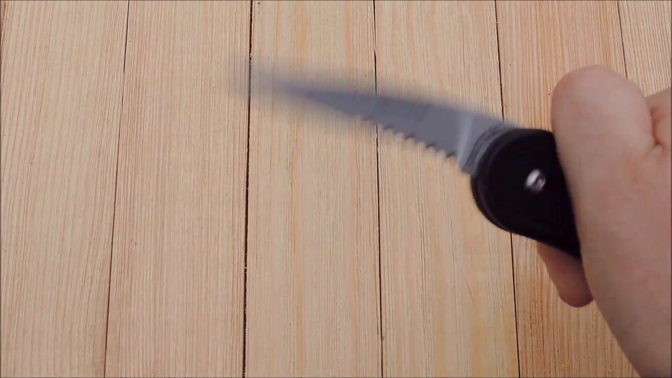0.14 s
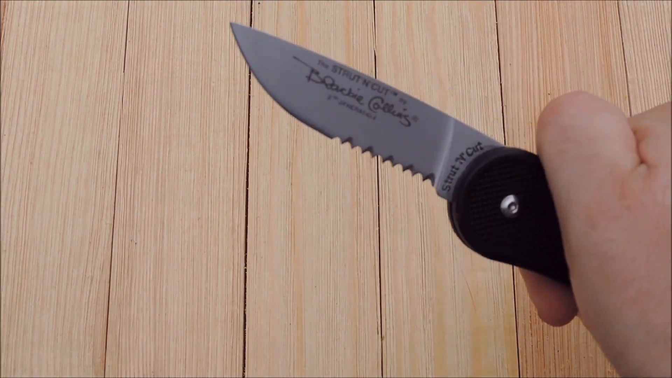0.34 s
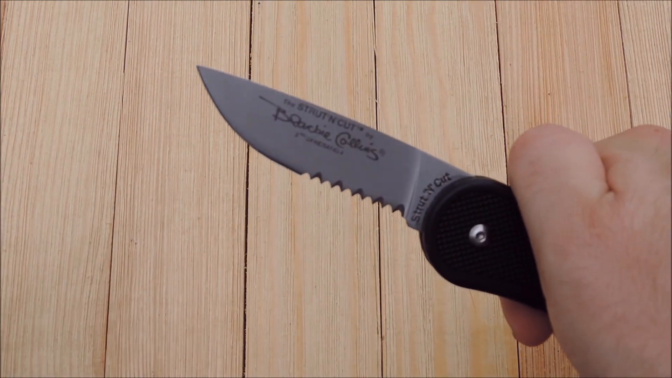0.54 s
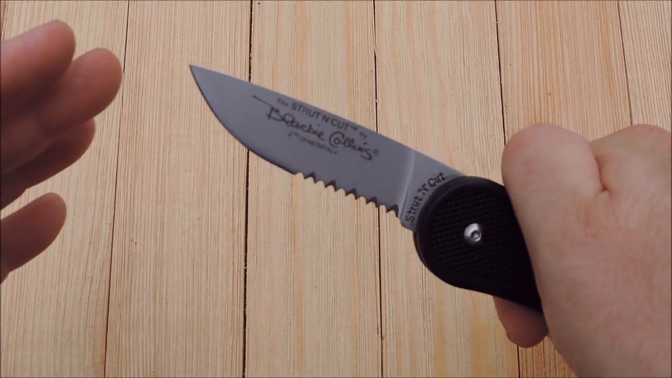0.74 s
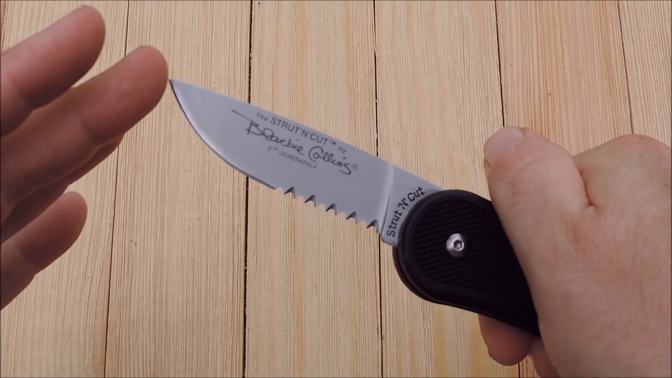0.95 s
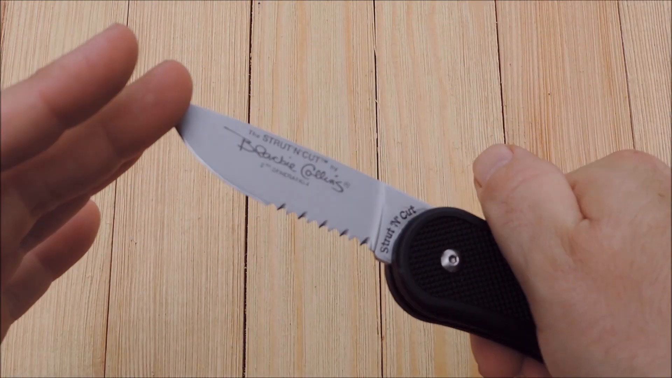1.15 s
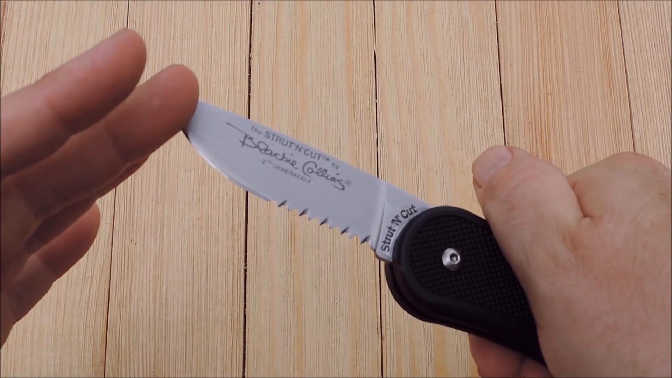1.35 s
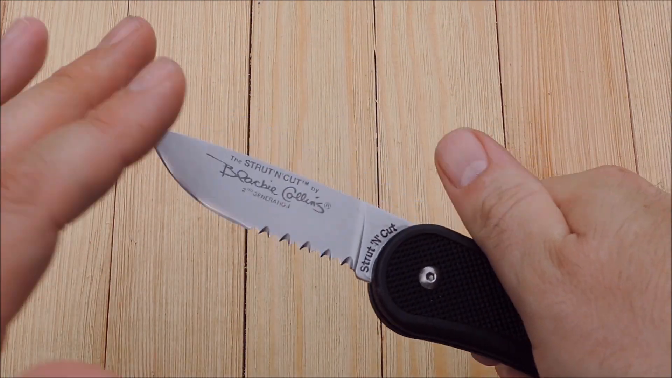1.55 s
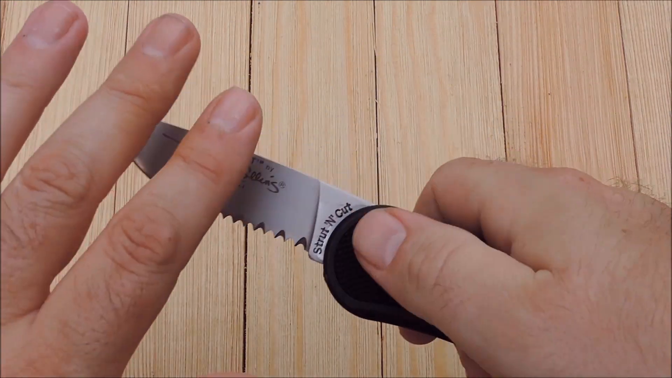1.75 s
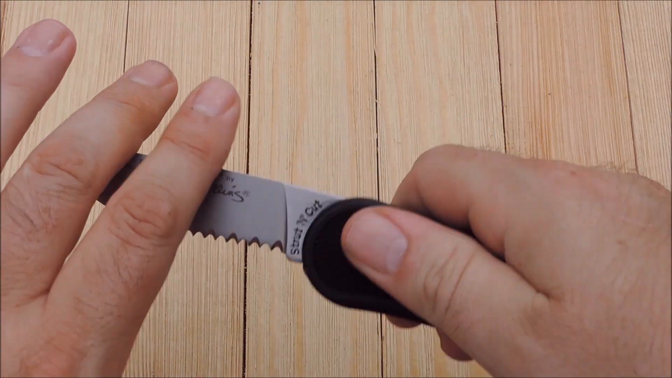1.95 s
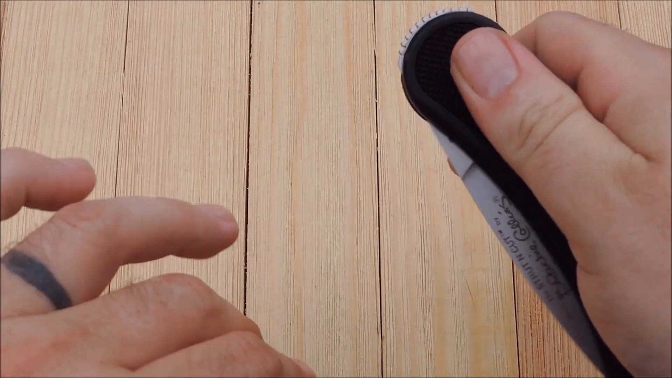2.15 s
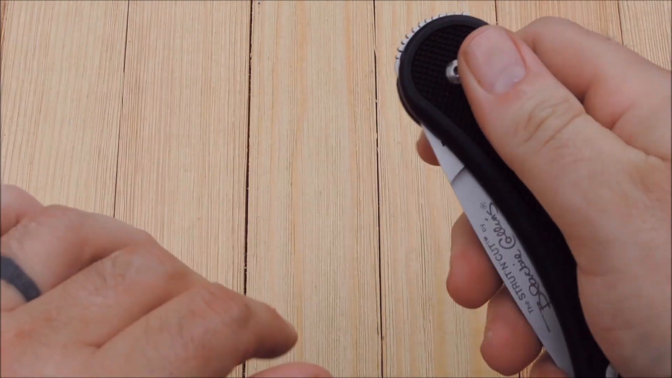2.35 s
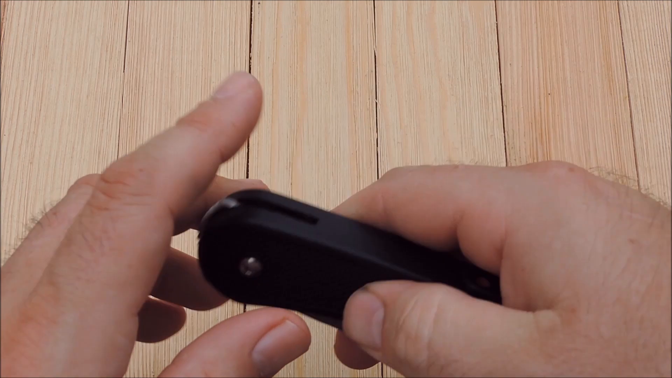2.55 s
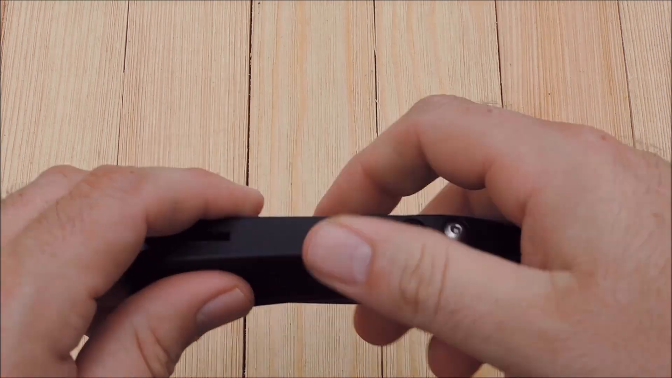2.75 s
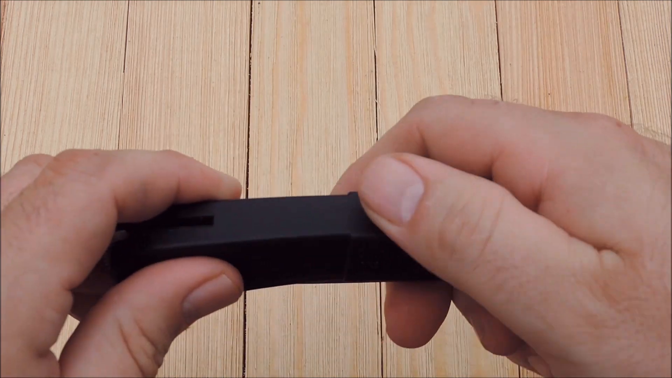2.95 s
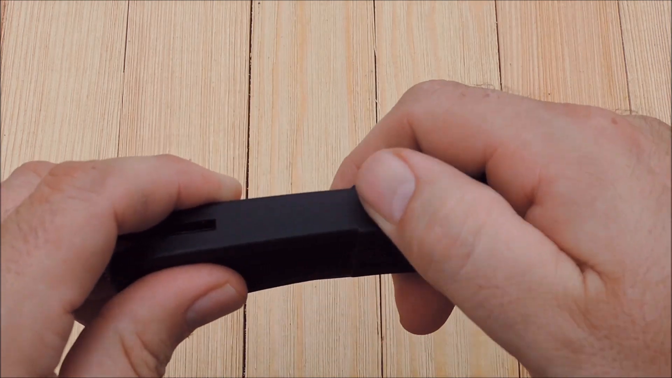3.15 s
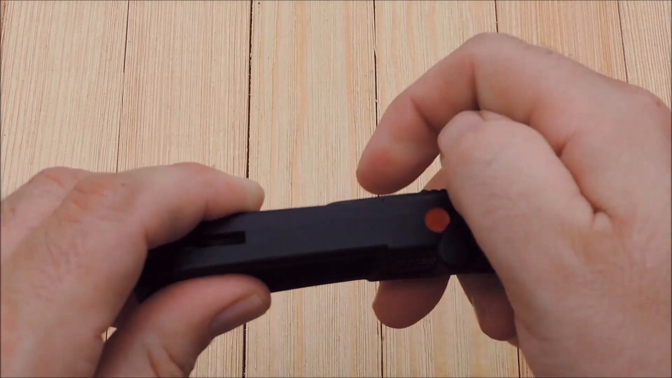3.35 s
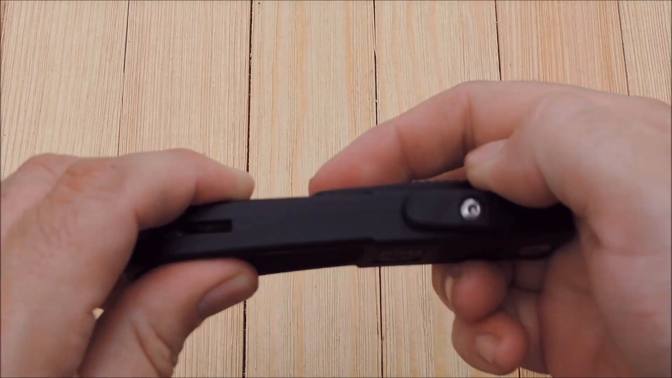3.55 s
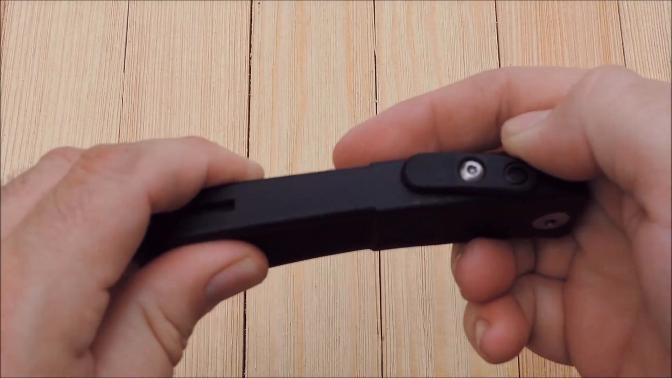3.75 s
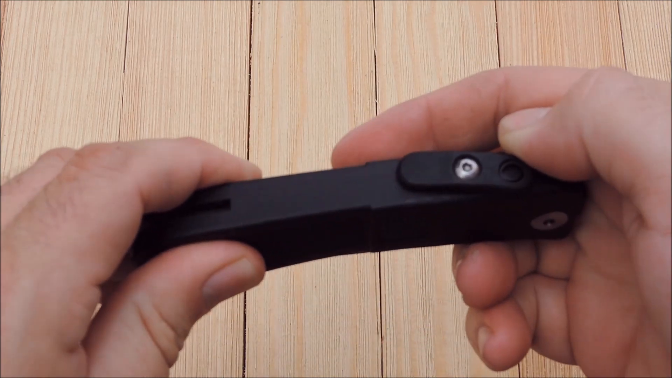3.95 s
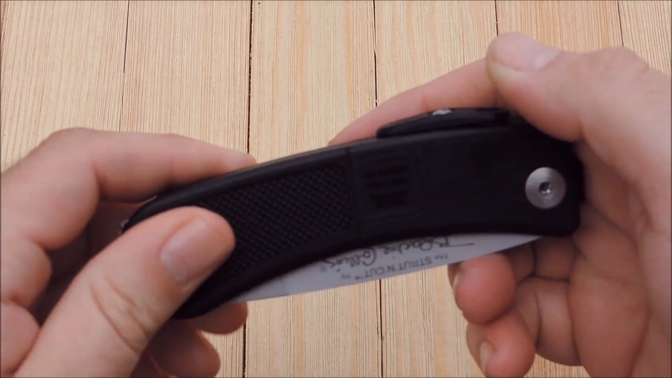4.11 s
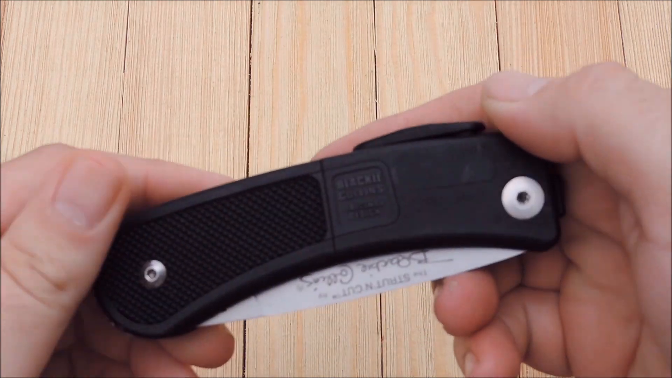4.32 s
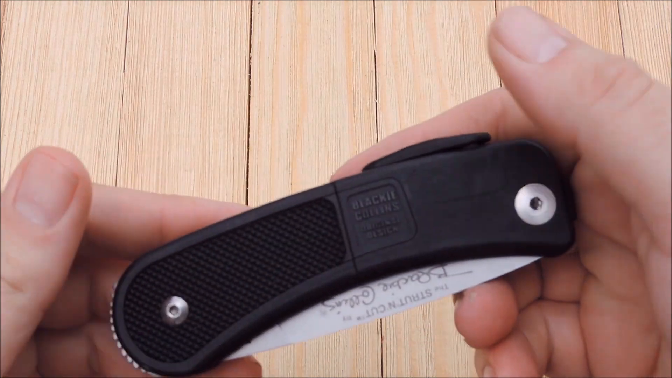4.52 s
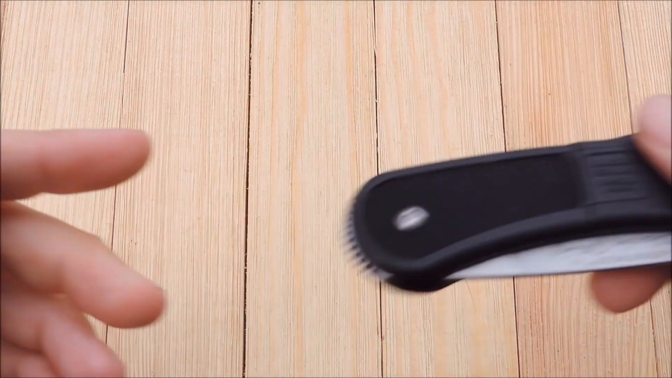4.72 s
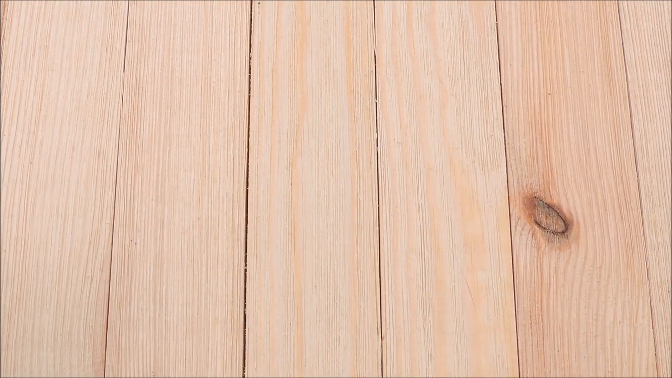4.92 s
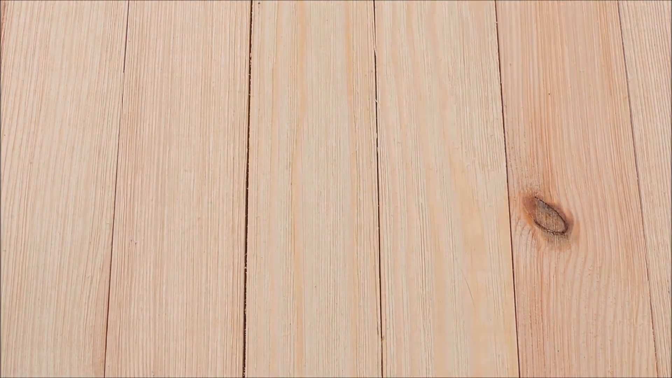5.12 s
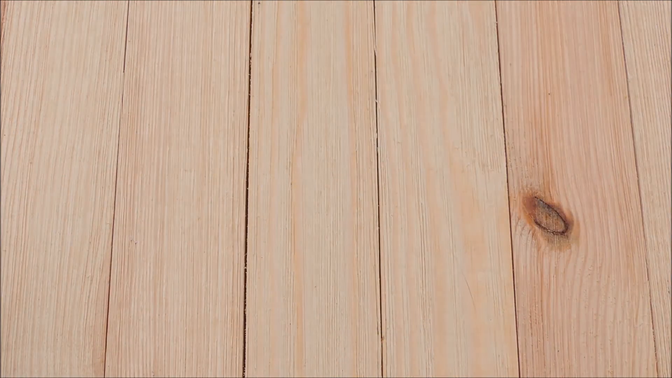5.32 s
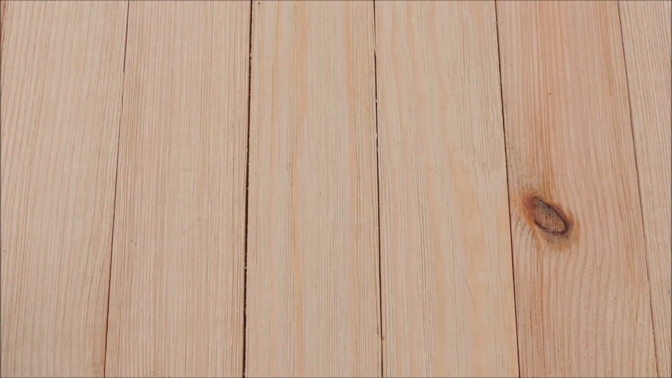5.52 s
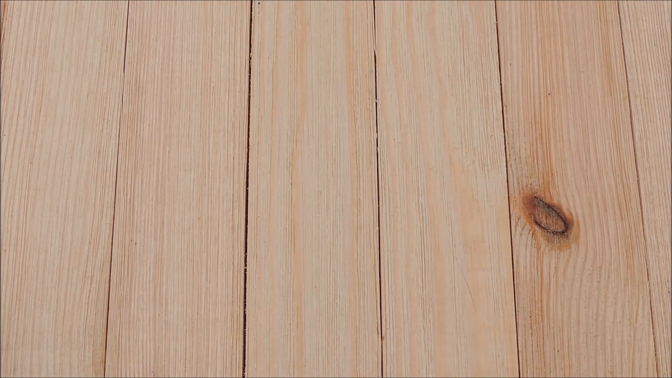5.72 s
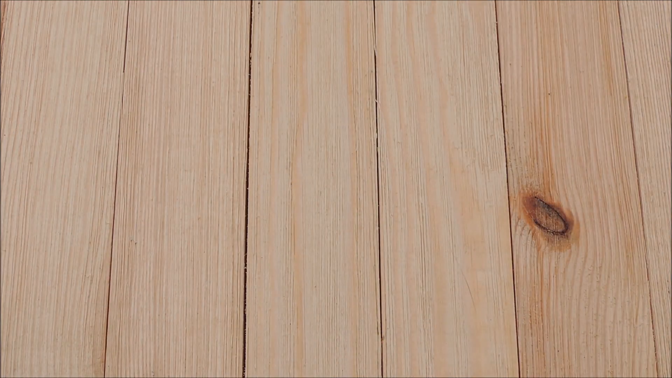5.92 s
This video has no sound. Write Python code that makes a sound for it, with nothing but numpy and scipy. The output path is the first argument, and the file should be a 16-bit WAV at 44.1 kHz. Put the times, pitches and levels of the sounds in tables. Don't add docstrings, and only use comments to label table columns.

```python
import sys
import numpy as np
from scipy import signal
from scipy.fft import rfft, irfft, next_fast_len
from scipy.io import wavfile
from scipy.ndimage import uniform_filter1d

SR = 44100
rng = np.random.default_rng(int(sys.argv[2]) if len(sys.argv) > 2 else 0)


def volts_from_decibels(level):
    exponent = np.asarray(level, float) / 20
    return 10 ** exponent


def log_audio(samples):
    frames = np.atleast_2d(samples).T
    limited = np.clip(frames, -1, 1)
    pcm = np.round(limited * 32767).astype(np.int16)
    wavfile.write(sys.argv[1], SR, pcm)


N = 267775
MS = 1000
HISS_TOP_HZ = 13520
OPEN_S, SHUT_S, CATCH_S = 0.3443, 2.2979, 3.7505

# (frequency [Hz], width [Hz], level [dB])
OPEN_STEEL = [(620, 580, -8.5), (1200, 480, -5), (3170, 740, 2.5), (3970, 730, 2.5), (4820, 590, -0.5),
              (6330, 590, -2.5), (8950, 580, -7), (11470, 520, -5), (13950, 1400, -9), (15400, 1070, -13)]
# (frequency [Hz], width [Hz], level [dB])
SHUT_STEEL = [(483, 160, -24), (1390, 1460, -3), (3280, 890, -4.5), (4200, 360, 5), (5700, 300, 0.5),
              (6810, 370, 0), (7900, 1000, -5.5), (9500, 480, -3), (11020, 370, -10), (12500, 670, -6.5),
              (15000, 1470, -16)]
# (frequency [Hz], width [Hz], level [dB])
CATCH_STEEL = [(500, 620, -25), (1500, 1300, -6), (2600, 1800, -6), (4430, 430, -6.5), (5850, 270, -1.5),
               (6970, 460, -2), (7900, 580, 3.5), (9300, 1450, -8.5), (12150, 550, -6), (14100, 580, -2),
               (15180, 800, -4)]
# (frequency [Hz], width [Hz], level [dB])
TABLE_MODES = [(600, 630, 1.5), (1310, 540, 6.5), (2400, 730, 6), (3180, 1450, 1.5), (5430, 690, -1.5),
               (7540, 930, -6), (9500, 700, -3), (12100, 1500, -16), (14000, 1200, -15), (15500, 800, -14)]
# (frequency [Hz], width [Hz], level [dB])
SLIDE_MODES = [(1900, 480, 0.5), (2700, 850, 2), (3580, 900, 1), (5440, 1200, -2), (7500, 1500, -11),
               (10000, 2000, -15), (13500, 1500, -12)]

# (frequency [Hz], density [dB per Hz])
HUM_SPECTRUM = [(12, -37), (20, -4), (122, -7), (182, -7), (220, -1.5), (261, -8), (454, -10.5), (561, -15),
                (1020, -15), (3200, -27.5), (4160, -59), (7040, -120)]
# (frequency [Hz], width [Hz], lift [dB])
STANDING_WAVES = [(55.7, 11.5, 4.5), (120.7, 10, 11.5), (158, 7.4, 4.5), (217.5, 4.2, 6.5), (235, 8.6, 4.5),
                  (292, 8.2, 5.5), (357.3, 8, 5), (374.5, 5.7, 4.5), (447.7, 10, 7.5), (668, 5.7, 6.5)]
# (frequency [Hz], density [dB per Hz])
HISS_SPECTRUM = [(2200, -39), (3000, -12), (3700, -4), (4600, -0.5), (5900, -3), (6500, -6.5),
                 (7600, -11.5), (8500, -17.5), (9500, -8.5), (10200, -13), (10600, -20), (13400, -22.5)]
# (frequency [Hz], width [Hz], lift [dB])
HISS_PEAKS = [(3580, 60, 5.5), (4490, 130, 5), (4830, 90, 3), (5530, 100, 0.5), (6000, 130, 1),
              (9860, 81, 3)]
# (frequency [Hz], correlation [-1 to 1])
LIKENESS = [(60, 0.9), (110, 0.96), (200, 0.95), (380, 0.88), (700, 0.73), (1290, 0.28), (2380, 0.14),
            (4400, -0.33), (8120, 0.17), (15000, 0.16)]
# (frequency [Hz], t60 [s])
REVERBERATION = [(300, 0.12), (2000, 0.26), (6000, 0.44), (14000, 0.15)]
# (frequency [Hz], level [dB])
ANSWER_LEVEL = [(500, 0), (2000, -4.5), (3200, -4.5), (6000, 3.5), (14000, -4.5)]

# (step down [s], release starts [s])
GAIN_STEPS = [
    (.002, 0.28),
    (0.348, 0.69),
    (2.301, 2.61),
    (3.756, 4.065),
]
# (time after first touch [ms], ring level [dB], ring frequency [Hz], ring swell [ms], crack level [dB])
OPEN_STAGES = [
    (0, -11.5, 2990, 0.33, -14),
    (.35, -6.5, 1965, .95, -25),
    (1.5, -23.5, 990, 0.6, -22),
]
SHUT_STAGES = [
    (0, -23, 1090, .17, -14),
    (.6, -5.5, 2580, .38, -30),
    (2.4, -14, 1900, 0.7, -12),
    (3.2, -7.5, 2330, .48, -29),
]
CATCH_STAGES = [
    (0, -30, 1120, 0.4, -32),
    (1.2, -28.5, 3220, 0.53, -20),
    (1.9, -29, 1840, .6, -23.5),
    (2.6, -33, 600, 0.34, -33),
]
# (time [s], ring level [dB], ring frequency [Hz], crack over ring [dB])
OPEN_TICKS = [
    (.0085, -42, 1900, -7),
    (.2535, -45.5, 1920, -17),
    (.3025, -40, 2100, -10),
    (.3115, -31.5, 1900, -24),
    (.337, -43.5, 1950, -6),
    (.372, -42, 1950, -14),
    (.402, -46, 1900, -4),
]
SHUT_TICKS = [
    (2.2565, -43.5, 2240, -7),
    (2.3125, -44, 2220, -3),
    (2.3465, -27, 2680, -5.5),
    (2.347, -31, 2080, -27),
    (2.4395, -40, 2730, -13),
]
SLIDE_TICKS = [
    (3.395, -39.5, 1950, 5),
    (3.3975, -36.5, 3420, -7),
    (3.402, -42, 2600, -10),
    (3.512, -32.5, 2920, -14),
    (3.595, -40, 2000, -14),
    (3.668, -63.5, 3000, 9),
]
# (time [s], thump level [dB], thump frequency [Hz], thump swell [ms], rattle level [dB])
TABLE_CONTACTS = [
    (5.9041, -34, 790, 0.48, -29.5),
    (5.9275, -23.5, 1200, 0.18, -30),
]
# (time [s], level [dB])
SWISH_TIMES = [
    (1.33, -59.5),
    (2.72, -64),
    (4.03, -64),
    (4.5, -63),
    (5.36, -59),
]


def unit(x):
    return x / np.sqrt(np.mean(x ** 2) + 1e-20)


def along(points, hz):
    f, v = np.transpose(points)
    return np.interp(np.log(hz + 1), np.log(f + 1), v)


def filtered(x, response):
    n = x.shape[-1]
    m = next_fast_len(n + 8192)
    return irfft(rfft(x, m) * response(np.fft.rfftfreq(m, 1 / SR)), m)[..., :n]


def resonances(modes):
    def response(f):
        total = 0
        for k, (centre, width, db) in enumerate(modes):
            damping = 1j * f * width
            total = total + (-1) ** k * volts_from_decibels(db) * damping / (centre * centre - f * f + damping)
        return total
    return response


def rush(response, patchy_db):
    z = signal.stft(rng.standard_normal((2, N)), nperseg=512)[2]
    field = uniform_filter1d(rng.standard_normal(z.shape[1:]), 8, axis=0)
    field = uniform_filter1d(field, 16, axis=1)
    pair = signal.istft(z * volts_from_decibels(patchy_db * unit(field)), nperseg=512)[1][:, :N]

    def mid_side(hz):
        turn = np.arccos(np.clip(along(LIKENESS, hz), -1, 1)) / 2
        return response(hz) * np.array([np.cos(turn), np.sin(turn)])

    mid, side = filtered(pair, mid_side)
    return unit(np.array([mid + side, mid - side]))


def lift(hz, bands):
    return 1 + sum((volts_from_decibels(db) - 1) / (1 + (2 * (hz - c) / w) ** 2) for c, w, db in bands)


def air():
    hum = rush(lambda hz: volts_from_decibels(along(HUM_SPECTRUM, hz)) * lift(hz, STANDING_WAVES), patchy_db=0.8)
    hiss = rush(lambda hz: volts_from_decibels(along(HISS_SPECTRUM, hz)) * lift(hz, HISS_PEAKS) * (hz < HISS_TOP_HZ),
                patchy_db=0.9)
    hum_balance_db, hiss_balance_db = [[0.45], [-0.45]], [[-0.2], [0.2]]
    return volts_from_decibels(-48.5) * hum * volts_from_decibels(hum_balance_db) + volts_from_decibels(-55.5) * hiss * volts_from_decibels(hiss_balance_db)


def room(x):
    hz, t, z = signal.stft(rng.standard_normal((2, SR // 3)), SR, nperseg=128)
    walls = volts_from_decibels(-60 * t / along(REVERBERATION, hz)[:, None])
    near_scatter = volts_from_decibels(14.5 - 60 * t / 0.029)
    brightness = volts_from_decibels(along(ANSWER_LEVEL, hz))[:, None]
    tail = signal.istft(z * (walls + near_scatter) * brightness, SR, nperseg=128)[1]
    late = np.pad(x.mean(axis=0), (130, 0))[None]
    return signal.fftconvolve(late, tail / np.linalg.norm(tail[0]), axes=1)[:, :N]


def swishing():
    t = np.arange(N) / SR
    grain = rush(np.ones_like, patchy_db=2.2)
    swish_s, glide_s = 0.11, 0.032

    def swell(late_s):
        return sum(volts_from_decibels(db) * np.exp(-((t - s - late_s) / swish_s) ** 2) for s, db in SWISH_TIMES)

    def band(hz, width):
        resonator = resonances([(hz, width, 0)])
        return unit(filtered(grain, lambda f: resonator(f) ** 2 * (f < HISS_TOP_HZ)))

    lower = swell(-glide_s) * band(hz=3660, width=760)
    upper = volts_from_decibels(1.0) * swell(glide_s) * band(hz=4300, width=1200)
    return lower + upper


def pivot():
    t = np.arange(N) / SR
    rise = np.clip((t - 0.27) / 0.03, 0, 1) ** 2
    rush_db = 15.5 * np.clip(1 + (t - OPEN_S) / 0.0128, 0, 1)
    stop = np.exp(-np.clip(t - OPEN_S, 0, None) / 0.0062)
    modes = [(1950, 380, 4.0), (4750, 900, -3), (9900, 4000, -13.5), (15000, 2020, -17)]
    return volts_from_decibels(-54.5 + rush_db) * rise * stop * rush(resonances(modes), patchy_db=2.0)


def ticks(rows, swell_ms):
    return [(s, db, hz, swell_ms, db + crack_db) for s, db, hz, crack_db in rows]


def snap(s, stages):
    return [(s + ms / MS, *rest) for ms, *rest in stages]


def rebounds(s, first_ms, gap_ms, ring_db, ring_hz, loss_db, swell_ms, crack_db, count):
    rows = []
    for k in range(count):
        time = s + (first_ms + k * gap_ms) / MS
        hz = ring_hz + 70 * rng.standard_normal()
        crack = ring_db + crack_db - k * (loss_db + 2.5)
        rows.append((time, ring_db - k * loss_db, hz, swell_ms, crack))
    return rows


def laying():
    rows = []
    for s, db, hz, swell_ms, rattle_db in TABLE_CONTACTS:
        rows.append((s, db, hz, swell_ms, db - 17))
        rows += rebounds(s, first_ms=1.7, gap_ms=4.2, ring_db=rattle_db, ring_hz=2000, loss_db=3,
                         swell_ms=0.76, crack_db=-11, count=4)
    return rows


def opening():
    chatter = rebounds(OPEN_S, first_ms=9, gap_ms=3.7, ring_db=-27.5, ring_hz=1950, loss_db=3.5,
                       swell_ms=0.5, crack_db=-4, count=3)
    return snap(OPEN_S, OPEN_STAGES) + chatter + ticks(OPEN_TICKS, swell_ms=0.71)


def closing():
    chatter = rebounds(SHUT_S, first_ms=6, gap_ms=2, ring_db=-25, ring_hz=2300, loss_db=9,
                       swell_ms=0.5, crack_db=-4, count=2)
    return snap(SHUT_S, SHUT_STAGES) + chatter + ticks(SHUT_TICKS, swell_ms=0.57)


def knife(contacts, steel, crack_ms, apart, pan_db, lag_ms, shell):
    choke = 1.27
    rings, cracks = np.zeros((2, 2, N + SR // 50))
    t_ms = np.arange(SR // 50) / SR * MS
    for s, ring_db, ring_hz, swell_ms, crack_db in contacts:
        at = int(s * SR)
        span = slice(at, at + len(t_ms))
        fraction_ms = (s * SR - at) / SR * MS
        since = np.clip(t_ms - fraction_ms - np.array([[lag_ms], [0]]), 0, None)

        u = since / max(2.56 * swell_ms, 0.1)
        envelope = (u * np.exp((1 - u ** choke) / choke)) ** 4.3
        rings[:, span] += volts_from_decibels(ring_db) * envelope * np.sin(2 * np.pi * ring_hz * since / MS)

        grit = rng.standard_normal((3, len(t_ms)))
        shared = np.array([np.roll(grit[0], round(lag_ms * SR / MS)), grit[0]])
        decay = (since > 0) * np.exp(-since / crack_ms)
        cracks[:, span] += volts_from_decibels(crack_db + 10.5) * decay * (shared + apart * grit[1:])
    rings = rings + filtered(rings, resonances([shell]))
    balance = volts_from_decibels([[pan_db / 2], [-pan_db / 2]])
    return balance * (rings + filtered(cracks, resonances(steel)))[:, :N]


def scene():
    opened = knife(opening(), OPEN_STEEL, crack_ms=1.12, apart=0.83, pan_db=2.5, lag_ms=0.028,
                   shell=(1960, 18, -15))
    shut = knife(closing(), SHUT_STEEL, crack_ms=0.81, apart=0.64, pan_db=-1.0, lag_ms=0.033,
                 shell=(2250, 40, -15))
    slide = knife(ticks(SLIDE_TICKS, swell_ms=0.29), SLIDE_MODES, crack_ms=1.3, apart=0.45, pan_db=-3.0,
                  lag_ms=0.015, shell=(2100, 50, -9))
    catch = knife(snap(CATCH_S, CATCH_STAGES), CATCH_STEEL, crack_ms=0.88, apart=0.61, pan_db=-4.0,
                  lag_ms=0.024, shell=(1870, 50, -6))
    laid = knife(laying(), TABLE_MODES, crack_ms=2.2, apart=0.77, pan_db=1.0, lag_ms=0.16,
                 shell=(2050, 18, 4))
    mix = air() + swishing() + pivot()
    for direct, wet_db in [(opened, -17), (shut, -13.5), (slide, -6), (catch, -27), (laid, 0.0)]:
        mix = mix + direct + volts_from_decibels(wet_db) * room(direct)
    return mix


def top_cut(x):
    return signal.sosfilt(signal.butter(12, 16830, fs=SR, output="sos"), x)


def record(dry):
    t = np.arange(N) / SR
    ducked = sum(np.interp(t, [down, down + 0.005, up, up + 0.032], [0, 1, 1, 0]) for down, up in GAIN_STEPS)
    gain = volts_from_decibels(-1.5 * ducked)
    offset = np.array([[0.05], [0.024]]) * (1 - gain)
    drained = filtered(offset, lambda hz: 1j * hz / (3.0 + 1j * hz))
    held = gain * dry / (1 + np.abs(dry / 0.67) ** 5) ** (1 / 5)
    heard = filtered(held, lambda hz: np.clip((16350 - hz) / 350 + 0.5, 0, 1))
    return top_cut(heard + drained)


dry = scene()
out = record(dry)
log_audio(out)
```